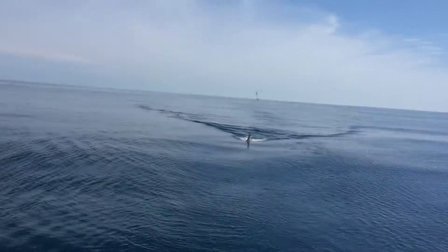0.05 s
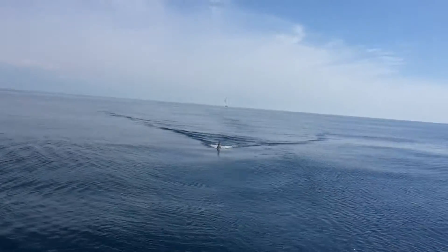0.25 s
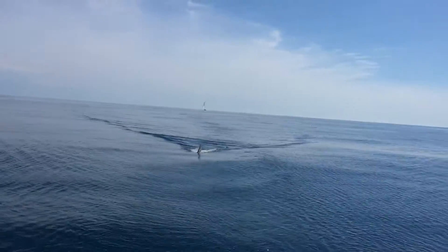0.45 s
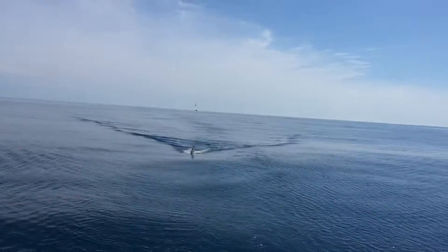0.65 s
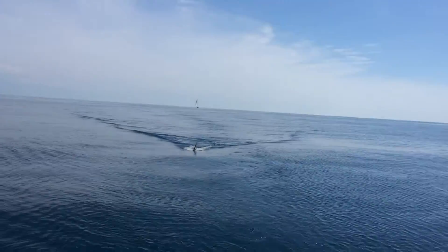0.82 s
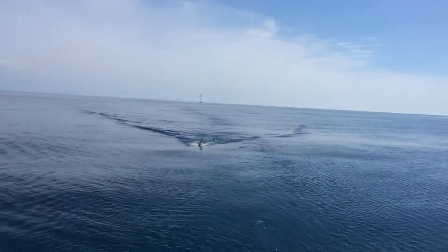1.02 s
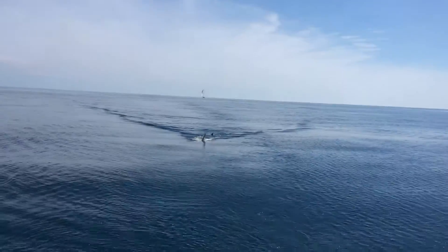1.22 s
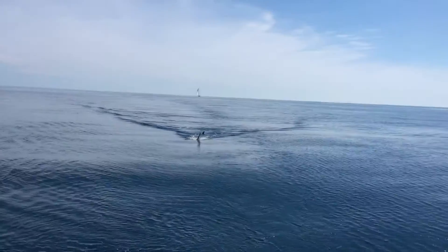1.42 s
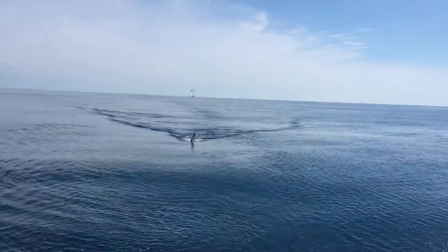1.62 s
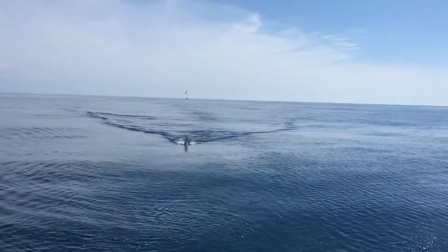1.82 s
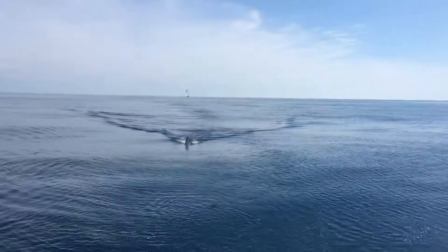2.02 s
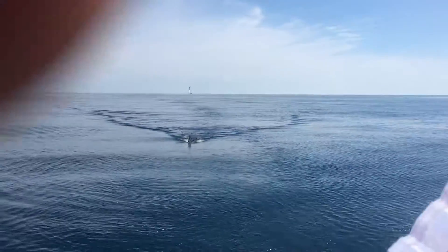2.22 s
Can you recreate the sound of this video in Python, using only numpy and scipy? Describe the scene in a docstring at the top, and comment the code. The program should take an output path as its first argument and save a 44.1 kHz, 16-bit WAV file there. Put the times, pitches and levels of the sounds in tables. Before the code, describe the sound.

Handling knocks, sharp clicks that drop into thumps, hit right at the microphone in three short bunches with light rubbing. Behind them are a low boat and wind rumble, brief gusts and the soft wash of a calm sea.

```python
"""Close knocks on a boat in a calm sea.

Wind and hull rumble low under a faint wash of water, with small laps and plops. Close knocks, most likely a
hand shifting on the phone's casing, come in three clusters, with soft taps, rubs and crackle between. Each is a
dry click that sweeps down into a thump. Brief gusts buffet the microphone."""
import sys
import numpy as np
from scipy.fft import rfft, irfft, next_fast_len
from scipy.io import wavfile
from scipy.ndimage import map_coordinates

SR = 44100
rng = np.random.default_rng(int(sys.argv[2]) if len(sys.argv) > 2 else 0)


def store_pcm(level_fs):
    """Save levels as 16-bit WAV."""
    pcm = np.round(np.clip(level_fs, -1, 1) * 32767).astype(np.int16)
    wavfile.write(sys.argv[1], SR, np.atleast_2d(pcm).T)


N = 103635
FFT_SIZE = 16384


def amp(db):
    """Decibels to gain."""
    return 10 ** (np.asarray(db) / 20)


def unit(x):
    """Scale to rms 1."""
    return x / np.sqrt(np.mean(x ** 2) + 1e-20)


def db_at(spectrum, hz):
    """Spectrum level, interpolated on a log frequency axis."""
    points_hz, db = np.transpose(spectrum)
    return np.interp(np.log(hz + 1), np.log(points_hz + 1), db)


def wobble(knots_per_s):
    """Smooth random curve."""
    return map_coordinates(rng.standard_normal(2048), [np.arange(N) * knots_per_s / SR], mode="wrap")


def filtered(x, response):
    """Apply a gain given as a function of Hz."""
    size = next_fast_len(N + FFT_SIZE)
    return irfft(rfft(x, size) * response(np.fft.rfftfreq(size, 1 / SR)), size)[:N]


def noise(*spectra):
    """Noise of rms 1, coloured by all the spectra."""
    return unit(filtered(rng.standard_normal(N), lambda hz: amp(sum(db_at(s, hz) for s in spectra))))


def impulses(per_s):
    """Sparse impulses of random time and size."""
    return rng.standard_normal(N) * (rng.random(N) < per_s / SR)


def swells(rows):
    """Envelope of summed Gaussian swells."""
    t = np.arange(N) / SR
    return sum(amp(db) * np.exp(-((t - time_s) / width_s) ** 2 / 2) for time_s, width_s, db in rows)


def minimum_phase(gain):
    """Causal response with this gain, by cepstral folding."""
    cepstrum = irfft(np.log(np.maximum(gain, 1e-6)))
    half = len(cepstrum) // 2
    return np.exp(rfft(np.r_[cepstrum[0], 2 * cepstrum[1:half], np.zeros(half)]))


def ringing(t60_s):
    """Spectrum of a decaying noise burst of energy 1."""
    burst = rng.standard_normal(FFT_SIZE) * amp(-60 * np.arange(FFT_SIZE) / SR / t60_s)
    return rfft(burst / np.linalg.norm(burst))


# Wind and hull: (frequency [Hz], level [dB])
RUMBLE_SPECTRUM = [(20, -43), (35, -10), (58, -2), (120, -7), (170, -7.5), (260, -25), (500, -41),
                   (2000, -48)]


def rumble(level_db=-45.5, swing_db=1):
    """Wind and hull: low, slightly unsteady noise."""
    return amp(level_db) * unit(noise(RUMBLE_SPECTRUM) * amp(swing_db * wobble(11.48)))


# Wash envelope: (time [s], level [dB])
WASH_LEVELS = [(0, -52.5), (.21, -52.5), (.36, -54), (.67, -54.5), (1.18, -55.5), (1.4, -53.5),
               (1.9, -52.5), (2.35, -54)]
# Wash colour: (frequency [Hz], level [dB])
WASH_SPECTRUM = [(100, -4), (300, -6), (600, -5.5), (950, -3.5), (1450, 0.5), (1950, 0), (2150, -11.5),
                 (2900, -8), (4200, -17), (4900, -25), (6200, -23.5), (7800, -36), (9900, -21.5),
                 (10600, -31.5), (13300, -19.5), (15800, -32)]


def wash(swing_db=0.23, fizz_db=-12.5, fizz_highpass_hz=5000):
    """Water washes softly along the hull, with a fine fizz."""
    level_db = np.interp(np.arange(N) / SR, *np.transpose(WASH_LEVELS))
    pops = impulses(per_s=150)
    fizz = unit(filtered(pops, lambda hz: amp(db_at(WASH_SPECTRUM, hz)) * hz / (hz + fizz_highpass_hz)))
    return amp(level_db + swing_db * wobble(14)) * (noise(WASH_SPECTRUM) + amp(fizz_db) * fizz)


# Wavelets: (time [s], width [s], level [dB])
LAPS = [(.05, 0.03, -46), (.17, 0.054, -40), (.73, 0.016, -52), (1.25, 0.031, -46.5), (2.19, 0.01, -45.5),
        (2.345, 0.0068, -42)]
# Wavelet colour: (frequency [Hz], level [dB])
LAP_SPECTRUM = [(80, -1), (200, 6.5), (450, 2.5), (900, -1), (1800, -7), (4000, -30), (12000, -29)]


def laps(gurgle_db=4.9):
    """Wavelets gurgle against the hull."""
    return swells(LAPS) * unit(noise(LAP_SPECTRUM) * amp(gurgle_db * wobble(83)))


# Air pockets: (time [s], pitch [Hz], level [dB], T60 [s])
PLOPS = [(0.044, 390, -36, .05), (0.426, 195, -29, 0.09), (0.524, 1163, -45, 0.17),
         (1.26, 323, -31.5, 0.047), (1.495, 777, -15.5, 0.042)]


def plops(attack_s=0.0045, rise_per_s=1.6, jitter_rad=0.89):
    """Air pockets ring briefly in the water, rising a little in pitch."""
    out = np.zeros(N)
    for time_s, hz, db, t60_s in PLOPS:
        t = np.maximum(np.arange(N) / SR - time_s, 0)
        phase = 2 * np.pi * hz * t * (1 + rise_per_s * t / 2) + jitter_rad * wobble(250)
        envelope = amp(db - 60 * t / t60_s) * (1 - np.exp(-t / attack_s))
        out += envelope * np.sin(phase)
    return out


# Casing resonances and hollows, also in knocks and crackle: (frequency [Hz], gain [dB])
CASING_RESPONSE = [(200, -1), (290, -4), (450, 1), (600, -2.5), (800, -0.5), (1180, -3.5), (1600, 1.5),
                   (2080, -2), (2450, -0.5), (3200, -3.5), (4100, -3), (5000, -8.5), (5700, -6), (7400, -8),
                   (9400, -3), (10400, -11), (13500, -5.5), (16000, -20.5)]
# Rub hiss: (frequency [Hz], level [dB])
HISS_SPECTRUM = [(150, 14), (500, 7), (1100, -8.5), (2100, 3), (3300, -1.5), (5500, -2.5), (9000, -8.5),
                 (15000, -11.5)]
# Rub scuff: (frequency [Hz], level [dB])
SCUFF_SPECTRUM = [(25, -40), (70, 9.5), (170, 4), (450, 0), (800, -6.5), (1500, -12), (5000, -34)]
# Hand strokes: (start [s], length [s], level [dB], scuff over hiss [dB], treble lift [dB])
RUBS = [(0.204, 0.034, -46, 13, -2.5), (0.235, 0.034, -42.5, 10.5, 1.5), (0.27, 0.075, -45.5, 13.5, 8.5),
        (0.41, 0.052, -59, 9, 11.5), (1.326, 0.11, -48, -1.5, -8.5), (1.448, 0.0088, -43, -4, 6),
        (1.509, 0.061, -31.5, -5.5, -1), (1.576, 0.16, -39.5, -1.5, -5), (1.765, 0.028, -42, 3, -13),
        (1.785, 0.049, -34.5, -5, -16), (1.936, 0.082, -53, 11, 4), (2.022, 0.038, -39, 16, 10),
        (2.114, 0.067, -60, 9.5, 13), (2.234, 0.01, -38.5, -7, -1), (2.321, .04, -41, -18, -8.5)]


def rubs(attack_s=0.0095, grain_db=0.5, treble_hz=4100):
    """A hand slides over the casing: grainy hiss over a low scuff."""
    t, out = np.arange(N) / SR, np.zeros(N)
    hiss, scuff = noise(HISS_SPECTRUM, CASING_RESPONSE), noise(SCUFF_SPECTRUM, CASING_RESPONSE)
    treble = filtered(hiss, lambda hz: hz ** 2 / (hz ** 2 + treble_hz ** 2))
    for start_s, length_s, db, scuff_db, treble_db in RUBS:
        release_s = 0.019 * np.sqrt(length_s / 0.18)
        attack = np.clip((t - start_s) / attack_s, 0, 1)
        release = np.exp(-np.maximum(t - start_s - length_s, 0) / release_s)
        friction = hiss + (amp(treble_db) - 1) * treble + amp(scuff_db) * scuff
        out += amp(db) * attack * release * friction
    return out * unit(amp(grain_db * wobble(500)))


THUMP_HZ, BODY_HZ, CLACK_HZ, CLICK_HZ, TICK_HZ = 109, 350, 1170, 3060, 8470
SWEEP_CYCLES, SWEEP_KNEE_HZ = 0.862, 89.6  # group delay = cycles / (frequency + knee)
# Contacts: (time [s], thump [dB], body [dB], clack [dB], click [dB], touched spot's pitch [Hz])
KNOCKS = [(0.2115, 24, 13, -8, -52, 513), (0.2258, 21, 2, -4, -8.5, 650),
          (.2815, 38.5, 31.5, 21.5, 13.5, 1540), (0.2892, 26, 11, -10, 13, 2940),
          (.2975, 29, 1, -3, 2.5, 3100), (.3431, 16, 14, 4, -1, 1460), (0.5498, 11, 3, -14, -39, 707),
          (0.6143, 18, 10.5, -11, -13.5, 429), (0.8647, 7, 2.5, 2, -18.5, 720),
          (1.1919, 11, 0, -9.5, -19, 2400), (1.2473, 20.5, 4, -8, -24.5, 726),
          (1.3529, 21.5, 12.5, 1.5, -13, 740), (1.4660, 13, 23, 18, 17.5, 2310),
          (1.4713, 37, 26.5, 10.5, 17.5, 3220), (1.5218, 24.5, 20, 11.5, 14, 4200),
          (1.6303, -7, -20, -9, 3, 13600), (1.9094, 15.5, 4, -26, -33, 606),
          (1.9567, 10, -3, -7.5, -8, 8930), (1.9699, 22, 3.5, -17, -27, 199),
          (2.0217, 4, 3, -28, -5, 14500), (2.0331, 25, 3, -11, -1, 600), (2.0431, 31, 23.5, 6, 6, 213),
          (2.0515, 29.5, 25.5, 1.5, 10.5, 2400), (2.053, 30.5, 31, 16, 16.5, 3060),
          (2.0645, 26.5, 23, 18.5, 8, 734), (2.0769, 25.5, 20, 14, 2.5, 1520),
          (2.0802, 23, 15, -21, 5.5, 2900), (2.1229, 20, 16.5, 10, -2.5, 7000)]


def knocks(low_cut_hz=45, spot_width_oct=0.14, rattle_db=-1.5, rattle_highpass_hz=1470, deck_db=-21):
    """One impulse through the casing per contact: treble leads, bass trails, the deck answers."""
    out, hz = np.zeros(N + 2 * FFT_SIZE), np.fft.rfftfreq(FFT_SIZE, 1 / SR)
    low_cut = hz ** 3 / np.sqrt(hz ** 6 + low_cut_hz ** 6)
    sweep = np.exp(-2j * np.pi * SWEEP_CYCLES * np.log1p(hz / SWEEP_KNEE_HZ))
    rattle_highpass = 1j * hz / (1j * hz + rattle_highpass_hz)
    for time_s, thump_db, body_db, clack_db, click_db, spot_hz in KNOCKS:
        tick_db = click_db - 12.5 + 0.083 * (click_db - clack_db)  # harder contact, more top treble
        colour = [(THUMP_HZ, thump_db), (BODY_HZ, body_db), (CLACK_HZ, clack_db),
                  (CLICK_HZ, click_db), (TICK_HZ, tick_db)]
        spot_peak_db = 5.5 + 0.18 * max(-click_db, 0)  # a light touch damps the spot less
        spot_db = spot_peak_db / (1 + (np.log2((hz + 1) / spot_hz) / spot_width_oct) ** 2)
        gain = amp(db_at(colour, hz) + db_at(CASING_RESPONSE, hz) + spot_db) * low_cut
        blow = minimum_phase(gain) * sweep
        rattle = amp(rattle_db) * ringing(t60_s=0.0095) * rattle_highpass
        deck = amp(deck_db) * ringing(t60_s=0.15)
        out[round(time_s * SR):][:FFT_SIZE] += irfft(blow * (1 + rattle + deck))
    return out[:N]


# Buffets: (time [s], width [s], level [dB])
GUSTS = [(.315, 0.034, -26.5), (.57, 0.055, -42), (1.385, 0.032, -38), (1.5, 0.0063, -27),
         (1.538, 0.0054, -19), (2.328, 0.008, -19.5)]
# Buffet colour: (frequency [Hz], level [dB])
GUST_SPECTRUM = [(20, -18), (50, 13), (80, 8), (130, -29), (300, -63), (2000, -82)]


def gusts():
    """Wind buffets the microphone in brief swells of deep noise."""
    return swells(GUSTS) * noise(GUST_SPECTRUM)


# Grip shifts: (time [s], width [s], level [dB])
GRIP_SHIFTS = [(.55, 0.16, -66.5), (1.05, 0.13, -70.5), (1.37, 0.035, -58), (1.99, 0.028, -49)]
# Slip colour: (frequency [Hz], level [dB])
SLIP_SPECTRUM = [(500, -11), (2500, -1), (6000, -2.5), (15000, -8.5)]


def crackle():
    """Tiny slips of the grip tick on the casing."""
    slips = impulses(per_s=200)
    ticks = filtered(slips, lambda hz: amp(db_at(SLIP_SPECTRUM, hz) + db_at(CASING_RESPONSE, hz)))
    return swells(GRIP_SHIFTS) * unit(ticks)


def scene():
    """Handling, wind and water, summed to mono."""
    return (knocks() + rubs() + crackle() + rumble() + gusts() + wash() + laps() + plops())[None]


def record(dry):
    """Soft clip at full scale, then a brick-wall low-pass."""
    cutoff_hz = 16300
    rounded = dry[0] / (1 + np.abs(dry[0]) ** 6) ** (1 / 6)
    return filtered(rounded, lambda hz: hz < cutoff_hz)[None]


dry = scene()
out = record(dry)
store_pcm(out)
```